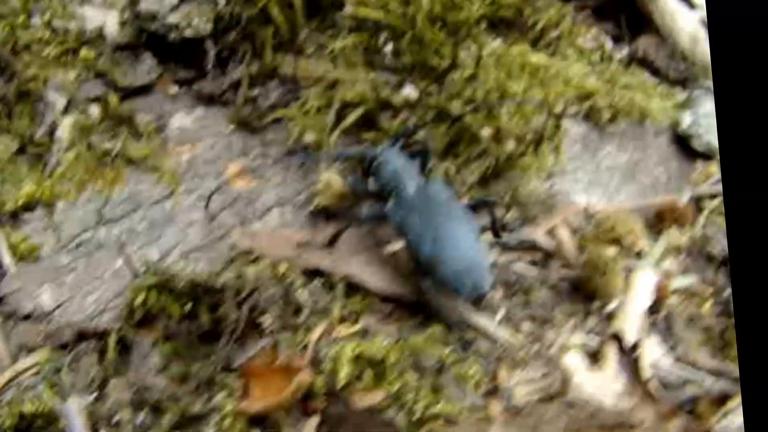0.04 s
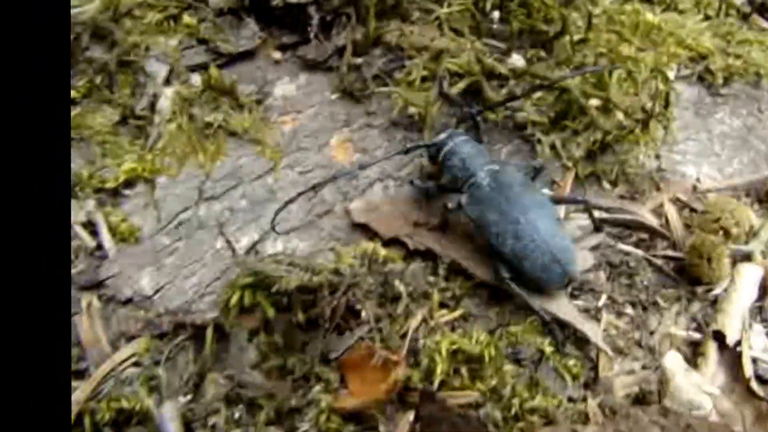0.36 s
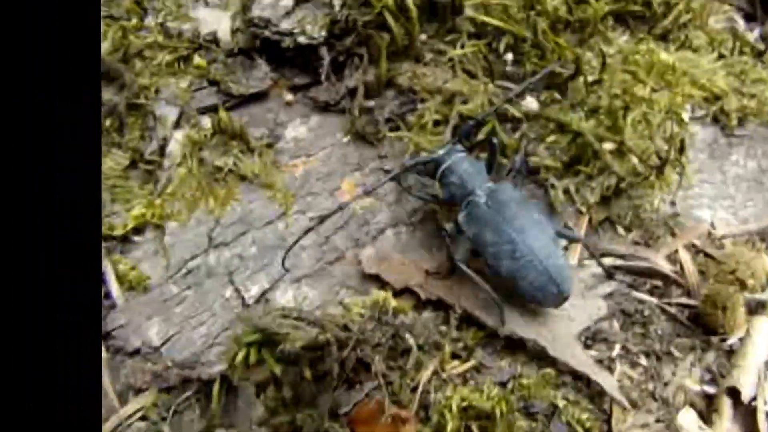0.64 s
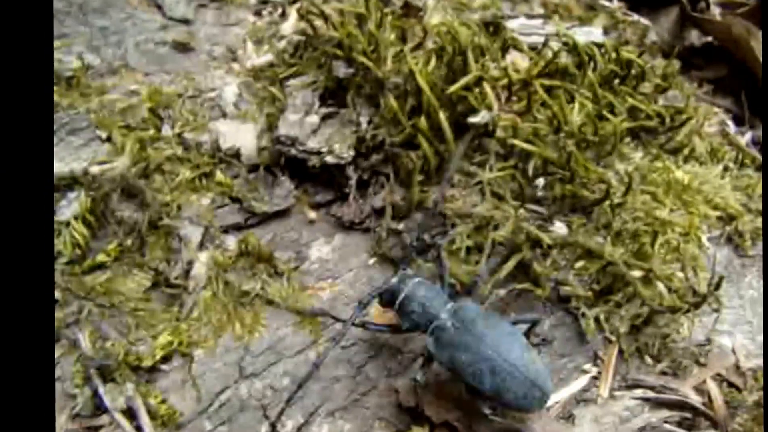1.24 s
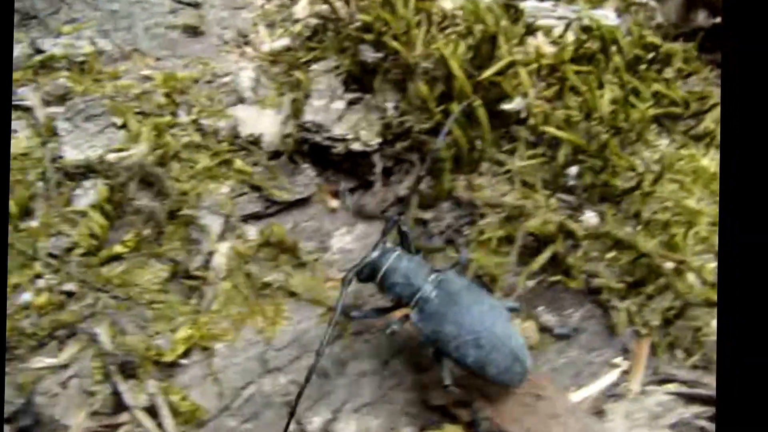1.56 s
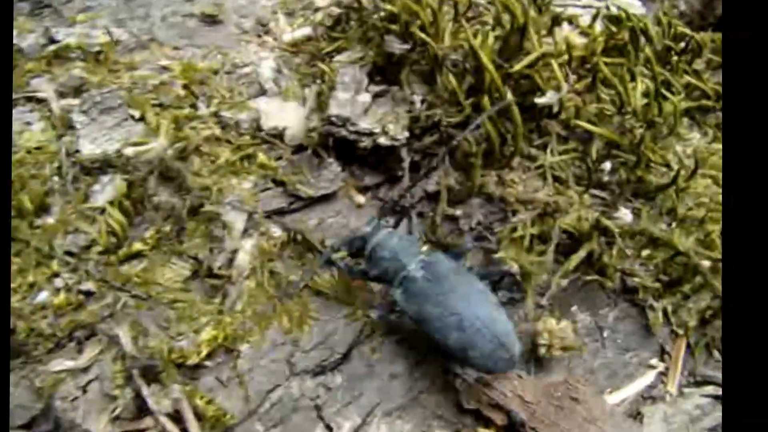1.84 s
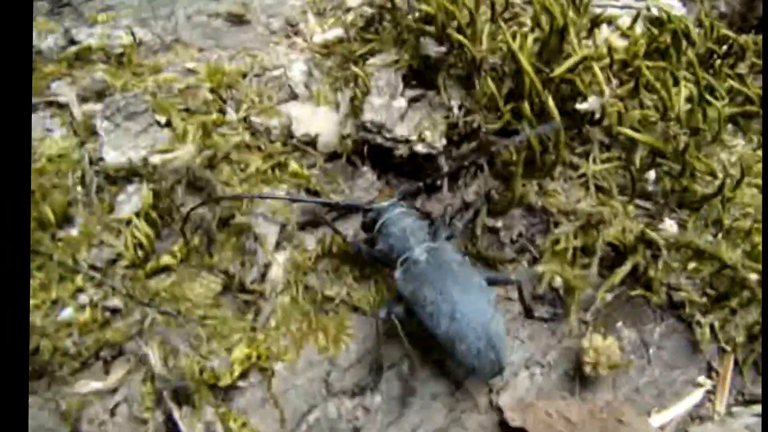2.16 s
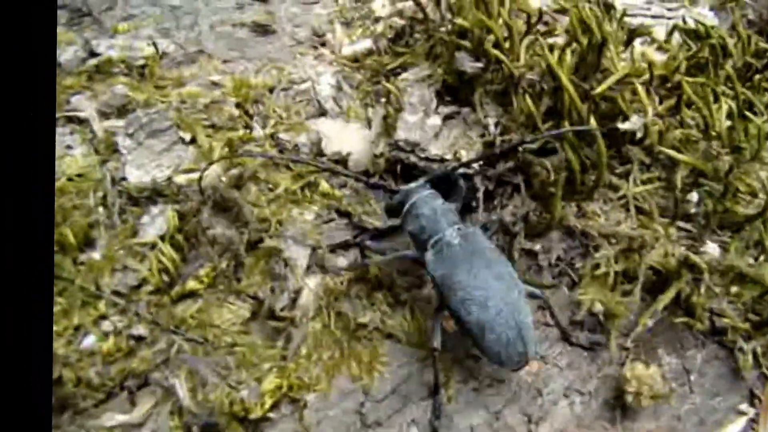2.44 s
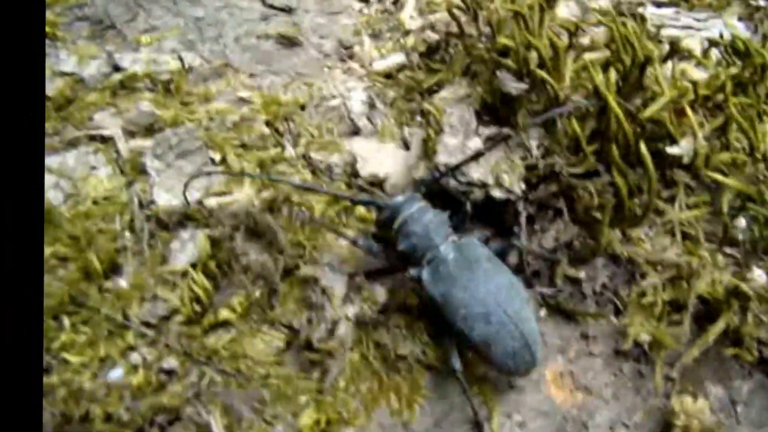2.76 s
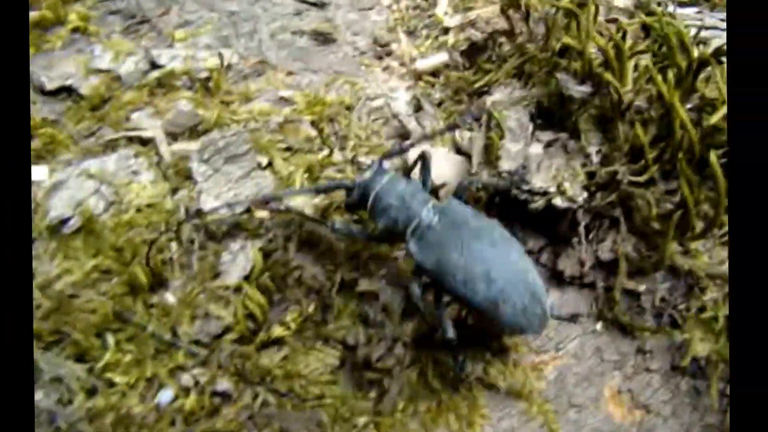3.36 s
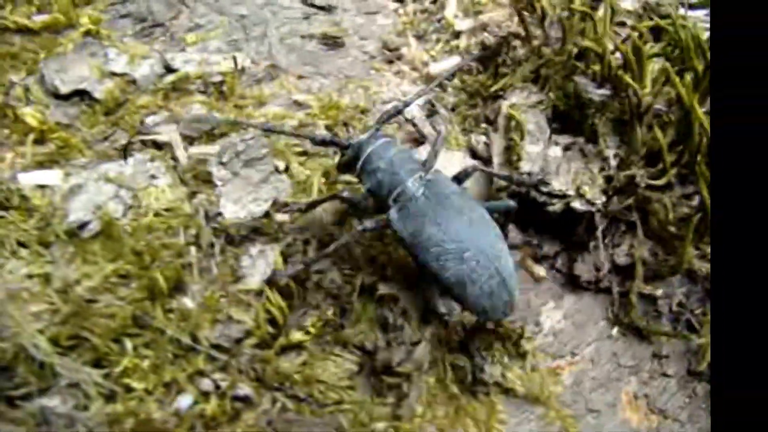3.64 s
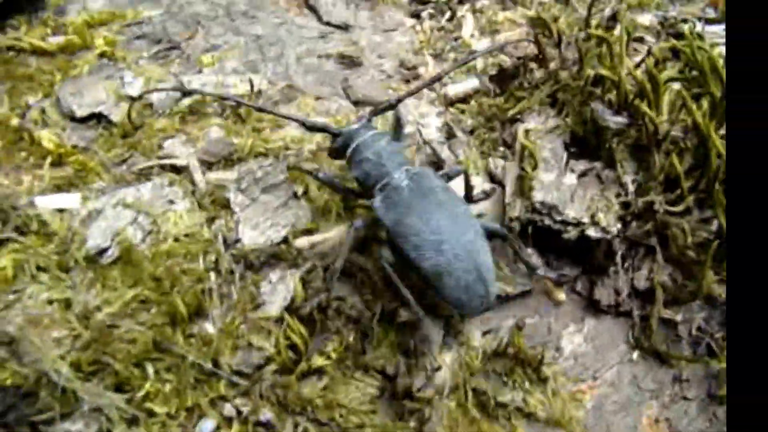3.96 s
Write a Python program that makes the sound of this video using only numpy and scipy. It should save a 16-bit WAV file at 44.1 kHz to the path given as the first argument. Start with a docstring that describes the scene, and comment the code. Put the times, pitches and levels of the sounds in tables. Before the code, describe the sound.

A steady hiss of wind or distant water fills a forest throughout, over a faint low hum. Close clicks, rubs and a squeak from handling the camera come in the first 0.6 seconds. From about 1.2 seconds a small bird whistles a falling trill, three arched slurs from 2.5, and a flourish from 3.1 to 3.7, lightly echoing. Soft handling bumps come near 2 seconds, a tick near 3.6.

```python
"""A forest, filled by a steady hiss of wind or distant water over a faint low drone and hum.
A small songbird whistles one phrase: a falling trill, three arched slurs and a flourish,
scattered by the trunks. A hand-held camera creaks and ticks, mostly at the start, as fingers
rub and knock its case, and bumps softly. The sound is mono."""
import sys
import numpy as np
from scipy import signal
from scipy.fft import rfft, irfft
from scipy.io import wavfile

SR = 44100
rng = np.random.default_rng(int(sys.argv[2]) if len(sys.argv) > 2 else 0)


def persist_wave(psi):
    """Save psi, clipped to +-1, as 16-bit WAV."""
    counts = np.round(np.clip(psi, -1, 1) * 32767).astype(np.int16)
    wavfile.write(sys.argv[1], SR, np.atleast_2d(counts).T)


N = 176400
T = np.arange(N) / SR


def undb(db):
    """Decibels to gain."""
    return 10 ** (np.asarray(db) / 20)


def shaped(x, gain):
    """x filtered by gain(Hz)."""
    return irfft(rfft(x) * gain(np.arange(N // 2 + 1) * SR / N + 1e-3), N)


def noise(gain):
    """Noise of rms 1 with the spectrum gain(Hz)."""
    x = shaped(rng.standard_normal(N), gain)
    return x / x.std()


def colour(points):
    """Gain against frequency, through (Hz, dB) points."""
    hz, db = np.array(points, float).T
    return lambda f: undb(np.interp(np.log(f), np.log(hz), db))


def walk(rate_hz):
    """Random drift of rms 1, rolling off above rate_hz."""
    return noise(lambda f: 1 / (1 + (f / rate_hz) ** 4) * (f > SR / N))


def decay(t, t60_s):
    """Exponential fade from t = 0."""
    return (t >= 0) * np.exp(-np.log(1000) * np.clip(t / t60_s, 0, 10))


def arch(start_s, length_s):
    """Half-sine envelope."""
    return np.sin(np.pi * np.clip((T - start_s) / length_s, 0, 1))


def whistle(curve, bend, edge_s=0.0019):
    """Sine note along (s, Hz, dB) points; bend scales its pitch."""
    s, hz, db = np.array(curve, float).T
    on = (T > s[0]) & (T < s[-1])
    t, out = T[on], np.zeros(N)
    fade = np.clip(np.minimum(t - s[0], s[-1] - t) / edge_s, 0, 1)
    phase = 2 * np.pi * np.cumsum(np.interp(t, s, hz) * bend[on]) / SR
    out[on] = fade * undb(np.interp(t, s, db)) * np.sin(phase)
    return out


def hiss():
    """Wind or distant water: octave bands swell together and flicker separately."""
    # Hiss spectrum. Each row: frequency in Hz, relative density in dB.
    density = [(18, -68), (30, -33), (129, -25.5), (168, -7), (205, -7.5), (302, -6.5), (367, -3.5),
               (404, -3.5), (515, -4.5), (673, -4), (1150, -1), (1470, -0.5), (2110, -0.5), (3350, -2.5),
               (4380, -4), (4710, -4.5), (5860, -6), (9300, -9.5), (10000, -13), (13000, -101),
               (22000, -120)]
    level_db, flicker_db, flutter_db = -33.5, 0.5, 1.74
    spectrum = rfft(noise(colour(density)))
    hz = np.arange(len(spectrum)) * SR / N
    octave = np.clip(np.log2(np.maximum(hz, 1) / 250), 0, 5)
    swell_db = 0.36 * walk(rate_hz=1.4)
    bands = []
    for k in range(6):
        band = irfft(spectrum * np.maximum(1 - abs(octave - k), 0), N)
        bands.append(band * undb(swell_db + flicker_db * walk(rate_hz=32)))
    bands[-1] *= undb(flutter_db * walk(rate_hz=180))
    return undb(level_db) * sum(bands)


def drone():
    """Faint low drone: noise in narrow resonances."""
    # Resonances. Each row: centre in Hz, half-width in Hz, level in dB.
    peaks = [(206.7, 6.3, -68.5), (131.2, 14, -66.5), (306, 24, -63.5), (500, 44, -55), (910, 76, -60.5)]
    return sum(undb(db) * noise(lambda f: 1 / (1 + ((f - hz) / width_hz) ** 2))
               for hz, width_hz, db in peaks)


def hums():
    """A low hum swells and fades, on a steady pitch each time."""
    # Hum swells. Each row: start in seconds, length in seconds, pitch in Hz, level in dB.
    swells = [(0.444, 0.22, 201, -48.5), (0.664, 0.24, 181.4, -48), (.88, 0.14, 169, -49),
              (1.586, 0.2, 208, -55), (2.31, 0.24, 200.4, -51), (2.56, 0.25, 205, -50.5),
              (2.8, 0.2, 163.3, -49.5), (3.083, 0.18, 201, -50.5), (3.28, 0.22, 200, -46.5),
              (3.56, 0.34, 204, -52.5)]
    return sum(undb(db) * arch(s, length_s) * np.sin(2 * np.pi * hz * T)
               for s, length_s, hz, db in swells)


def bumps(width_s=0.0041):
    """Each soft bump of the hand pushes the microphone there and back once."""
    # Bumps. Each row: centre in seconds, level in dB.
    pushes = [(1.925, -54), (2.043, -54), (2.08, -59)]
    return sum(undb(db) * 2 * (T - s) / width_s * np.exp(-((T - s) / width_s) ** 2) for s, db in pushes)


def handling():
    """Clicks and rubs ring the camera's case; soft contacts knock dully, hard ones add a bright snap."""
    # Contacts. Each row: start in seconds, relative level in dB, snap offset in dB, knock cutoff in Hz.
    clicks = [(.0115, -6, -7, 3000), (.014, -15, -12, 3000), (.0252, -6, 0, 1500), (.0445, -17, -4, 4000),
              (.049, -10, -9, 1300), (.063, -23, 0, 3000), (.139, -24, 2, 3000), (.296, -18, 7, 1300),
              (.3075, -23, 12, 1200), (.309, -26, 12, 1500), (.317, -23, 5, 4000), (.377, -4.5, -11, 1100),
              (.3945, -23, 8, 1500), (.6015, -12, -3, 1200), (3.594, -18, 7, 6000)]
    # Finger rubs. Each row: start in seconds, length in seconds, level in dB, brightness in dB.
    rubs = [(-.03, 0.12, -32, -2), (0.04, 0.05, -37, -6), (0.265, 0.069, -56, 11), (0.515, 0.11, -48, 14),
            (1.856, .07, -44, 7), (2.88, 0.078, -36, -1)]
    # Case modes. Each row: frequency in Hz, relative level in dB, T60 in seconds.
    modes = [(538, -13.5, 0.031), (837, -11, 0.025), (1120, -0.5, 0.011), (1245, -0.5, 0.014),
             (1417, -3.5, 0.025), (1730, -2.5, 0.007), (2177, -2, 0.015), (2670, 0.5, 0.014),
             (3100, 2.5, 0.015), (3660, -14, 0.012)]
    # Snap spectrum. Each row: frequency in Hz, gain in dB.
    snap_eq = [(500, -10), (2500, 2), (5300, 4.5), (7500, 0), (10000, -1)]
    knock_db, snap_db, grit_db, low_cut_hz = 11.5, 4.5, -15, 346
    knock_noise, snap_noise = rng.standard_normal((2, N))
    force, snap = np.zeros(N), np.zeros(N)
    for s, db, bright_db, cutoff_hz in clicks:
        tick = signal.unit_impulse(N, int(s * SR))
        knock_grit = undb(grit_db) * decay(T - s, t60_s=0.003) * knock_noise
        snap_grit = undb(grit_db) * decay(T - s, t60_s=0.006) * snap_noise
        contact = signal.butter(2, cutoff_hz, fs=SR, output="sos")
        force += undb(db + knock_db) * signal.sosfilt(contact, tick + knock_grit)
        snap += undb(db + snap_db + bright_db) * (tick + snap_grit)
    for s, length_s, db, bright_db in rubs:
        pressure = undb(db) * arch(s, length_s)
        force += pressure * knock_noise
        snap += undb(bright_db) * pressure * snap_noise
    ring = sum((-1) ** k * undb(db) * np.cos(2 * np.pi * hz * T) * decay(T, t60_s)
               for k, (hz, db, t60_s) in enumerate(modes))
    case = signal.fftconvolve(force, ring / np.linalg.norm(ring))[:N]
    low_cut = signal.butter(2, low_cut_hz, "high", fs=SR, output="sos")
    return signal.sosfilt(low_cut, case + shaped(snap, colour(snap_eq)))


def squeaks():
    """Close, dry and rough: a finger's scrape that sinks in pitch, and one sharp chirp."""
    # One curve a squeak. Each point: time in seconds, pitch in Hz, level in dB.
    curves = [
        [(0, 3916, -27), (.022, 3610, -31), (.044, 3150, -26), (.066, 2900, -37), (.082, 2860, -30),
         (.115, 2850, -42)],
        [(1.646, 3550, -30), (1.65, 3350, -24.5), (1.654, 3150, -26)],
    ]
    bend = 1 + 0.07 * walk(rate_hz=600)
    return sum(whistle(curve, bend) for curve in curves)


def forest(x):
    """Direct sound, a few trunk echoes, quick scatter and a longer faint tail."""
    # Echoes off the nearest trunks. Each row: delay in seconds, level in dB.
    trunks = [(.009, -7.5), (.017, -10), (.027, -20.5), (.039, -11.5)]
    response = np.zeros(N)
    for db, t60_s in ((-9.5, 0.23), (-5, 0.66)):  # scatter, tail
        tail = rng.standard_normal(N) * decay(T - 0.006, t60_s)
        response += undb(db) * tail / np.linalg.norm(tail)
    response[0] = 1
    for delay_s, db in trunks:
        response[int(delay_s * SR)] += undb(db)
    return signal.fftconvolve(x, response)[:N]


def bird(level_db=-2):
    """A songbird's wavering whistle: trill, slurs, thin chips, a flourish from buzz to rasp."""
    # Trill notes. Each row: turn time in seconds, pitch in Hz, relative level in dB.
    trill = [(1.16, 4450, -43), (1.27, 4500, -38), (1.385, 4330, -40), (1.49, 4330, -37),
             (1.597, 4350, -36), (1.70, 4210, -34.5), (1.803, 4190, -31), (1.905, 3810, -27),
             (2.0, 3740, -27), (2.095, 3620, -28), (2.19, 3614, -28), (2.288, 3610, -28.5),
             (2.388, 3550, -28)]
    # A trill note dives, then rises. Each row: seconds from the turn, pitch ratio, gain in dB.
    trill_note = [(-.011, 1.33, -13), (-.005, 1.25, -4), (-.002, .95, -2), (.001, .82, -2), (.005, .985, 0),
                  (.015, 1, 1.5), (.034, 1.005, -3), (.046, 1, -14)]
    # Slurs. Each row: start in seconds, pitch ratio, relative level in dB.
    slurs = [(2.458, 1.004, -26), (2.651, 1.01, -27.5), (2.843, 1.01, -26)]
    # A slur arches, dips and falls away. Each row: seconds from its start, base pitch in Hz, gain in dB.
    slur_note = [(0, 3650, 0), (.013, 4130, -5), (.026, 4327, -1.5), (.035, 4306, 1.5), (.040, 3444, -0.5),
                 (0.044, 2910, -1), (.055, 3350, 6), (.062, 3120, -21), (.070, 2863, 2), (0.081, 2460, -3)]
    # Flourish, one curve a syllable. Each point: time in seconds, pitch in Hz, relative level in dB.
    flourish = [
        [(3.058, 3145, -47), (3.066, 2790, -26), (3.078, 2480, -45), (3.092, 2890, -27), (3.112, 3100, -23.5),
         (3.135, 3350, -28.5), (3.155, 3620, -28), (3.18, 3690, -32)],
        [(3.236, 3270, -27), (3.247, 2980, -26), (3.255, 3876, -32), (3.263, 3895, -19.5), (3.27, 3880, -27),
         (3.275, 3030, -26), (3.289, 2400, -31)],
        [(3.329, 2290, -44), (3.341, 2720, -22), (3.349, 3190, -21.5), (3.355, 3380, -36)],
        [(3.458, 2680, -31), (3.477, 2450, -32), (3.495, 2920, -26), (3.508, 3290, -23), (3.514, 3820, -21.5),
         (3.522, 3950, -39)],
        [(3.574, 4345, -33), (3.586, 3850, -28), (3.594, 4300, -27), (3.608, 4100, -26), (3.619, 3270, -28),
         (3.631, 2636, -30), (3.645, 2520, -42), (3.69, 2400, -34)],
    ]
    # Thin notes. Each row: start and length in seconds, first and last pitch in Hz, relative level in dB.
    chips = [(1.862, 0.017, 5300, 5540, -35), (1.959, 0.015, 5240, 5100, -37),
             (2.06, 0.017, 4580, 4590, -35), (2.15, 0.018, 4600, 5150, -36),
             (2.205, 0.018, 4900, 4570, -38), (2.257, 0.012, 5000, 4900, -37),
             (2.277, 0.016, 5130, 4630, -30), (2.31, 0.052, 4770, 4930, -41),
             (2.763, 0.012, 2430, 2450, -28.5)]
    buzz_hz, rasp_hz = 137.6, 270
    drift = walk(rate_hz=260)
    waver = 1 + 0.014 * drift
    song = np.zeros(N)
    for notes, shape, bend in ((trill, trill_note, 1 + 0.018 * drift), (slurs, slur_note, waver)):
        for s, pitch, db in notes:
            song += whistle(np.array(shape) * [1, pitch, 1] + [s, 0, db], bend)
    buzz_fm = 0.082 * np.sin(2 * np.pi * buzz_hz * T)
    rasp_am = 1 + 0.5 * np.sin(2 * np.pi * rasp_hz * T)
    song += whistle(flourish[0], waver + buzz_fm)
    song += sum(whistle(curve, waver) for curve in flourish[1:-1])
    song += whistle(flourish[-1], 1 + 0.055 * drift) * rasp_am
    for s, length_s, first_hz, last_hz, db in chips:
        song += whistle([(s, first_hz, db), (s + length_s, last_hz, db)], waver)
    return undb(level_db) * song


def scene():
    """Everything at one microphone, the same in both channels."""
    mono = hiss() + drone() + hums() + forest(bird()) + handling() + squeaks() + bumps()
    return np.array([mono, mono])


def record(dry):
    """The camera cuts the top steeply."""
    cutoff_hz = 10150
    return signal.sosfilt(signal.ellip(10, 0.2, 80, cutoff_hz, fs=SR, output="sos"), dry)


dry = scene()
out = record(dry)
persist_wave(out)
```